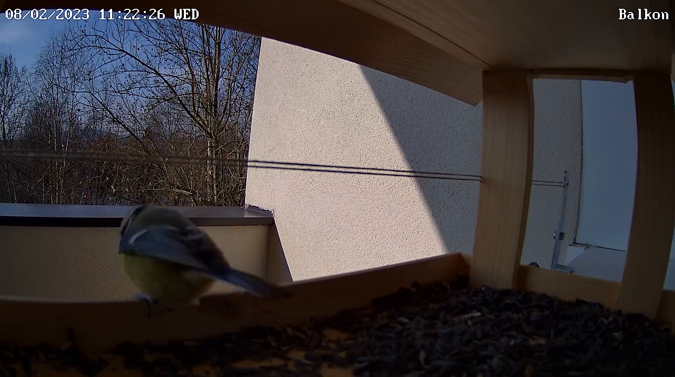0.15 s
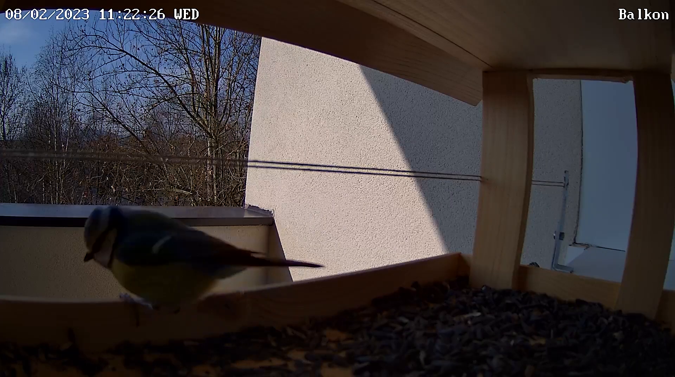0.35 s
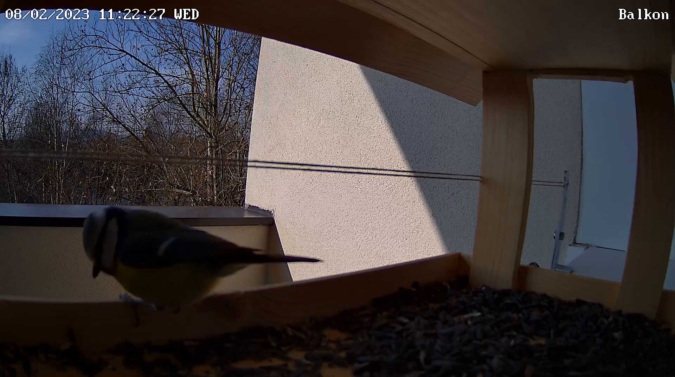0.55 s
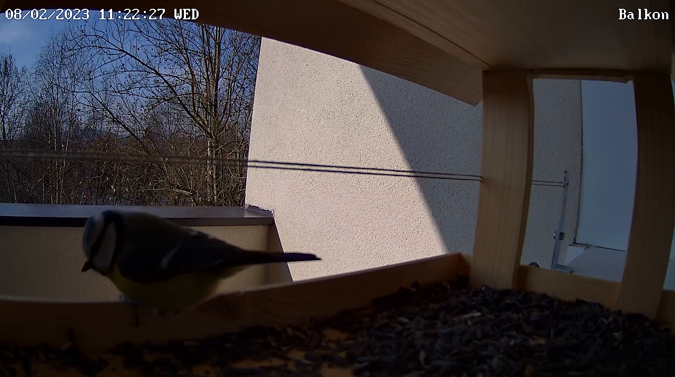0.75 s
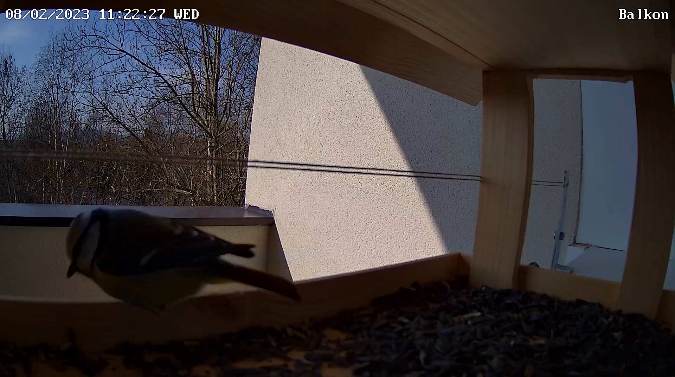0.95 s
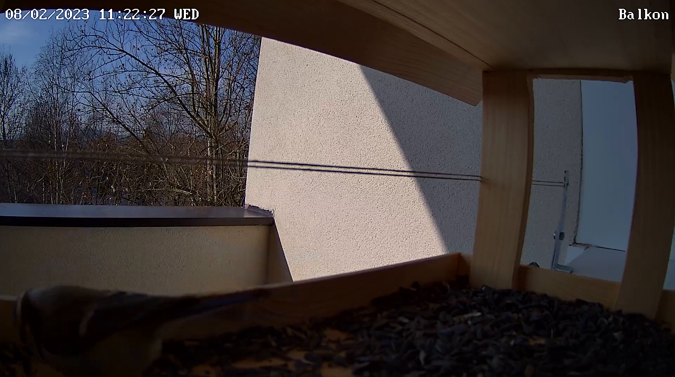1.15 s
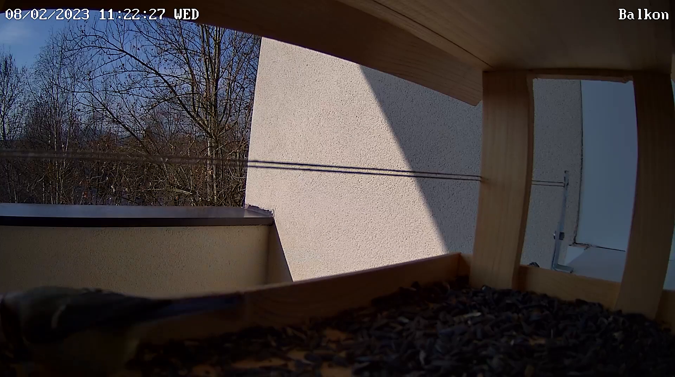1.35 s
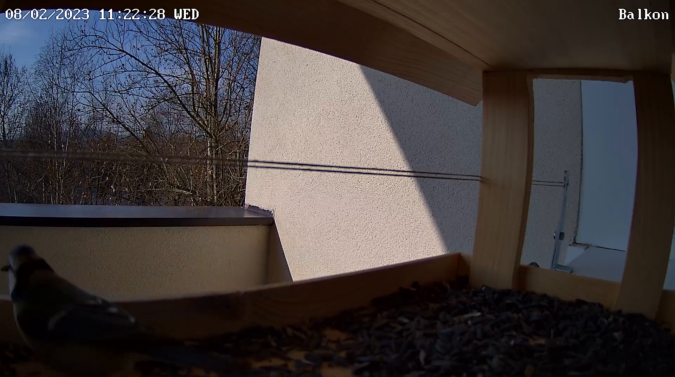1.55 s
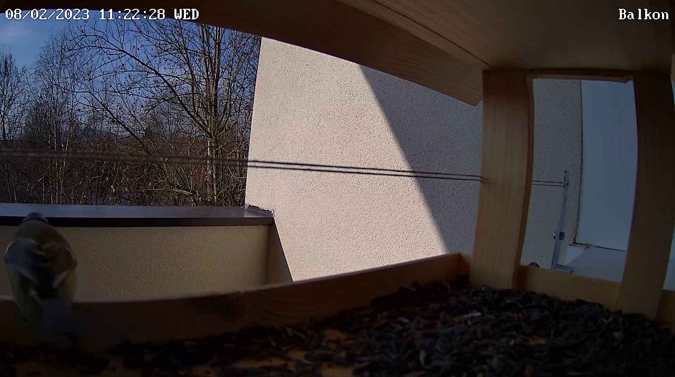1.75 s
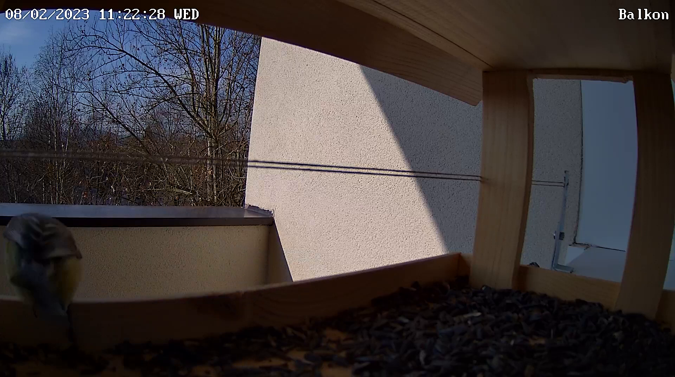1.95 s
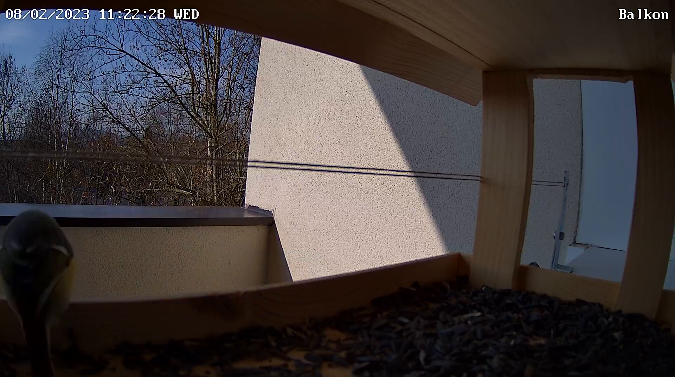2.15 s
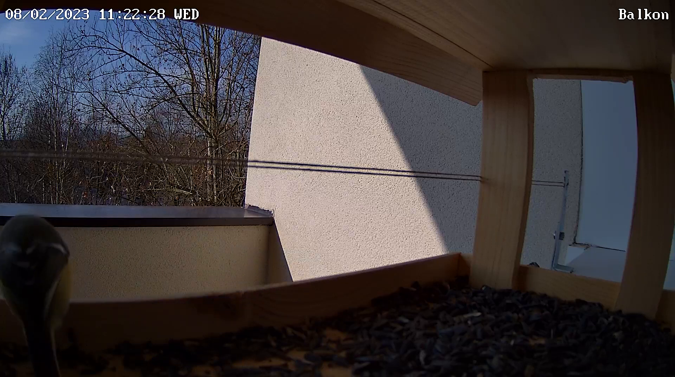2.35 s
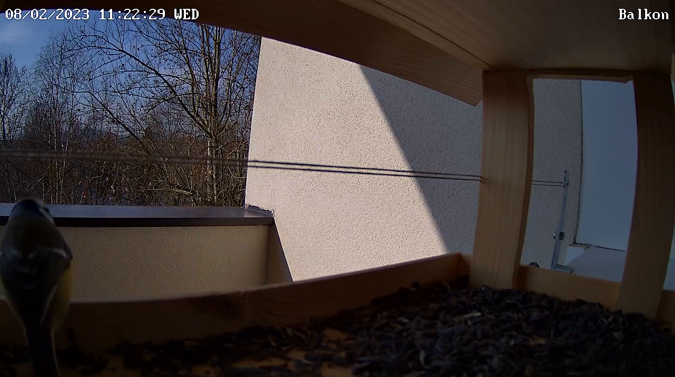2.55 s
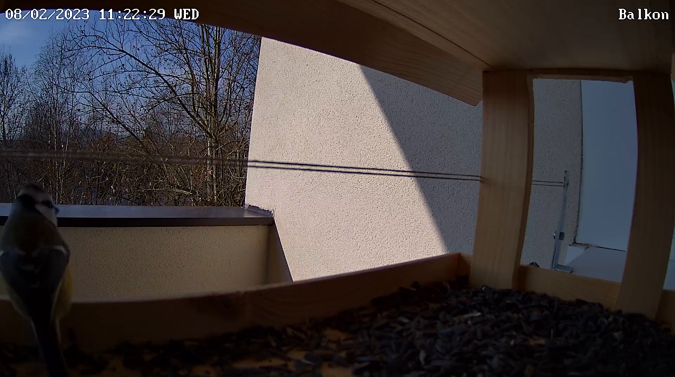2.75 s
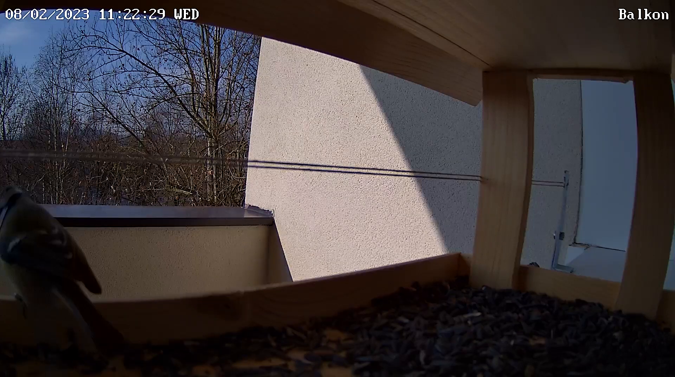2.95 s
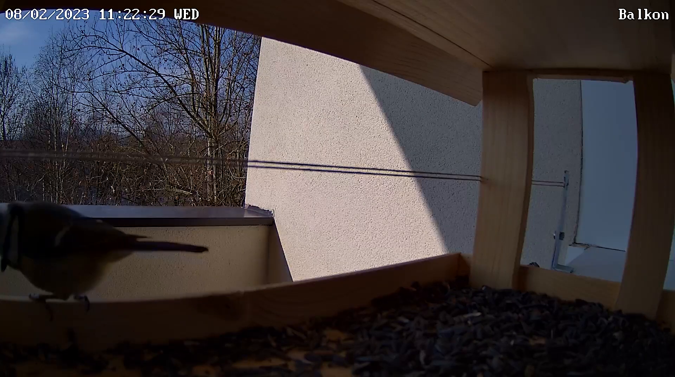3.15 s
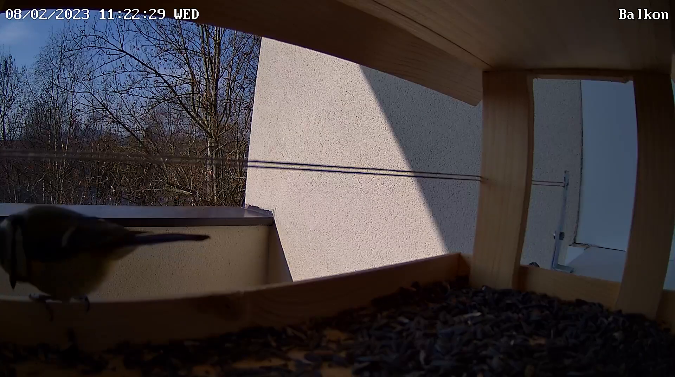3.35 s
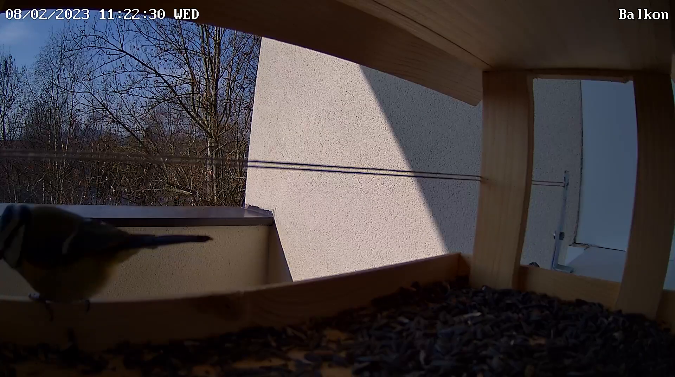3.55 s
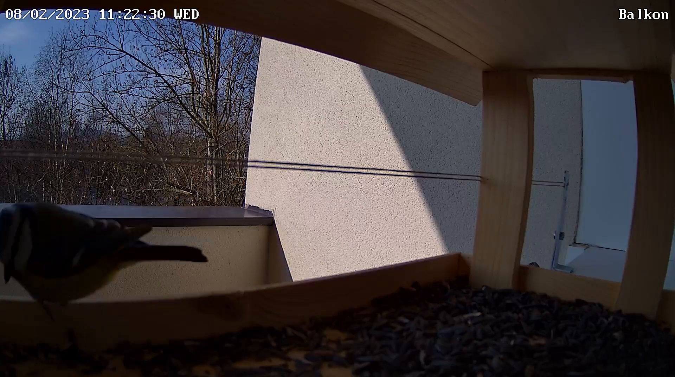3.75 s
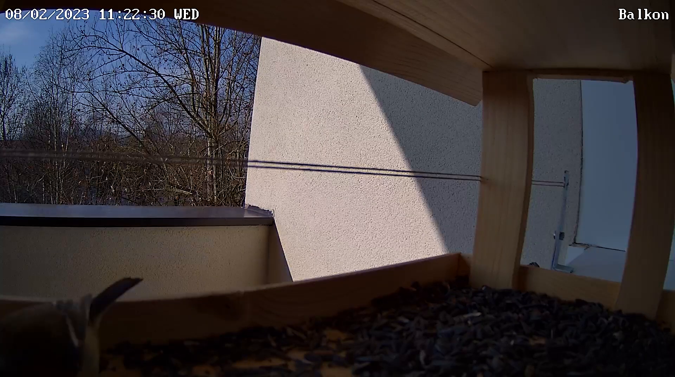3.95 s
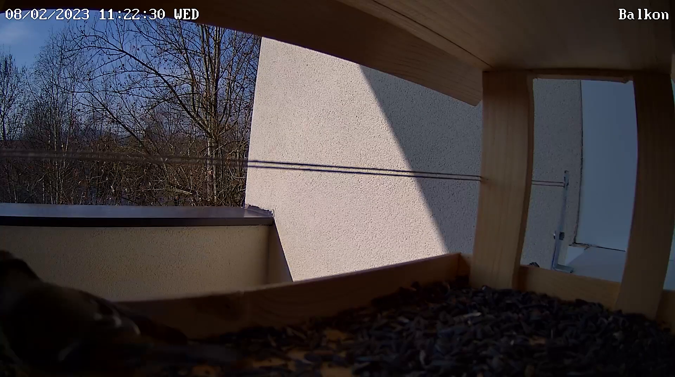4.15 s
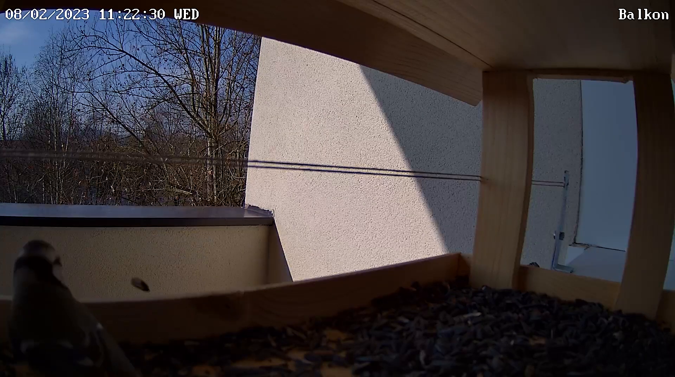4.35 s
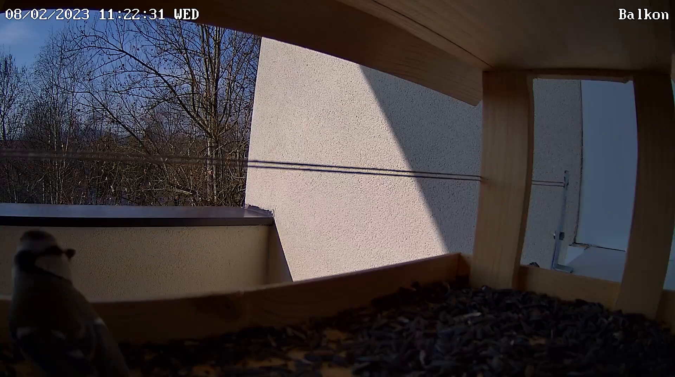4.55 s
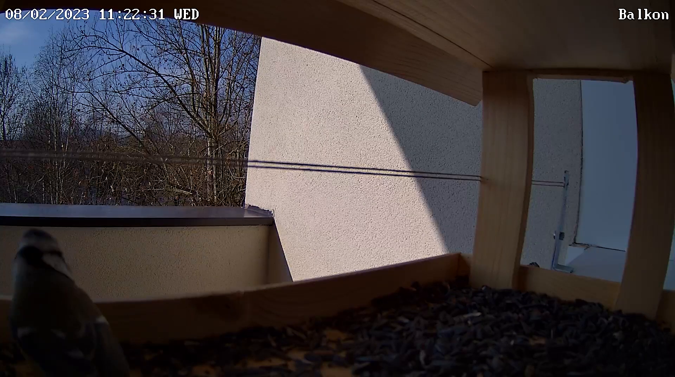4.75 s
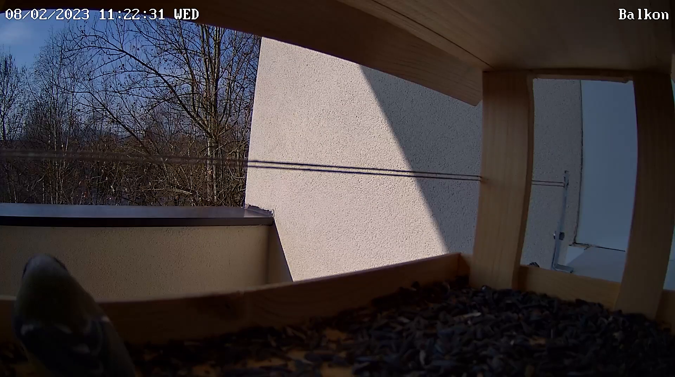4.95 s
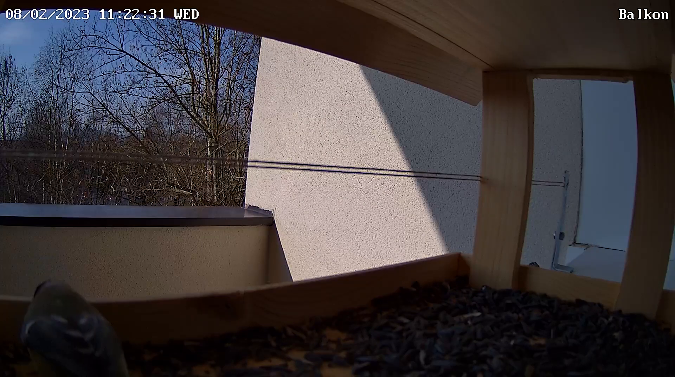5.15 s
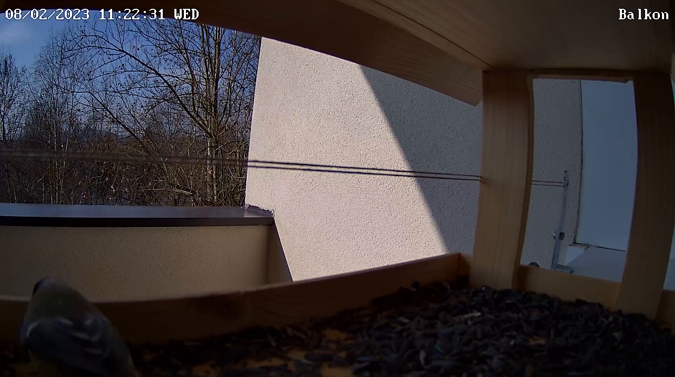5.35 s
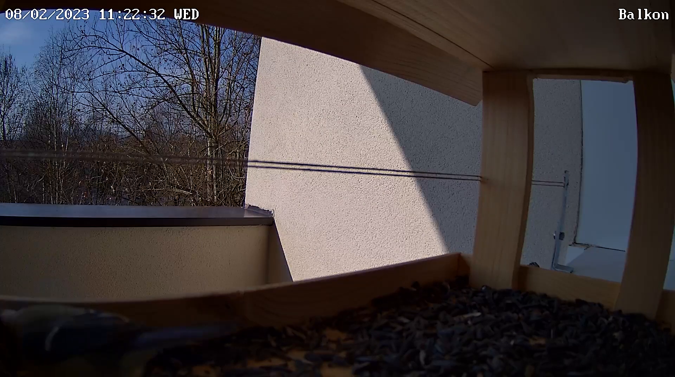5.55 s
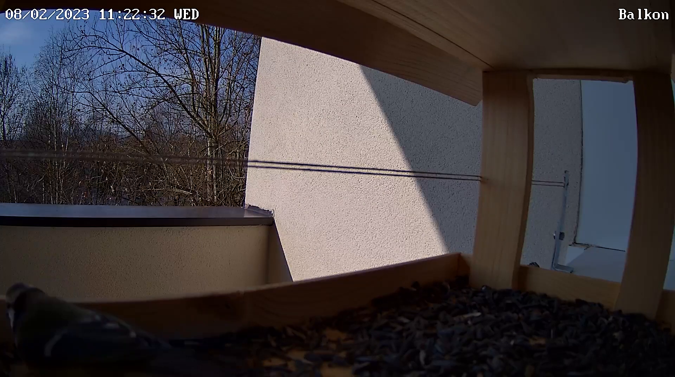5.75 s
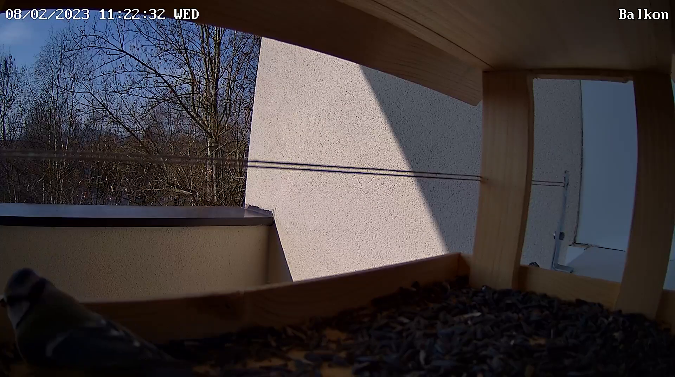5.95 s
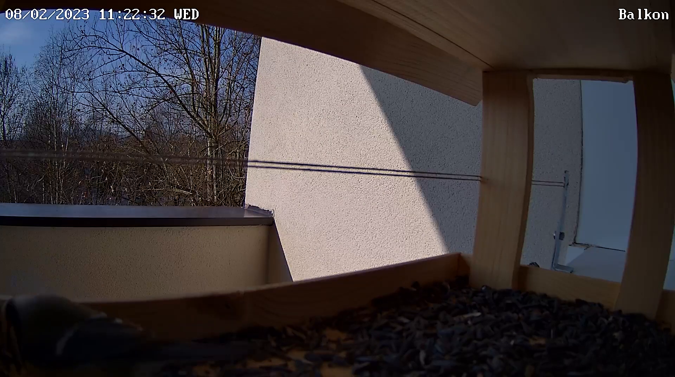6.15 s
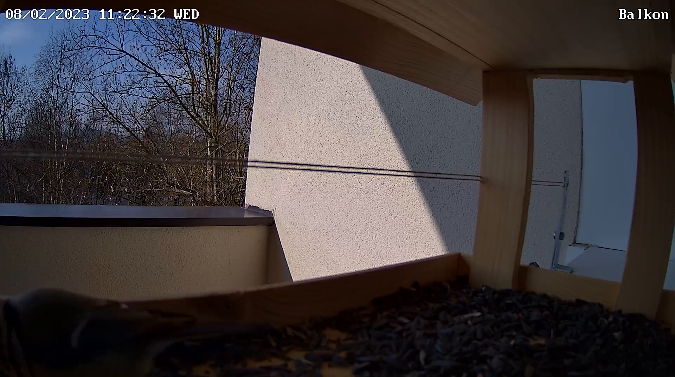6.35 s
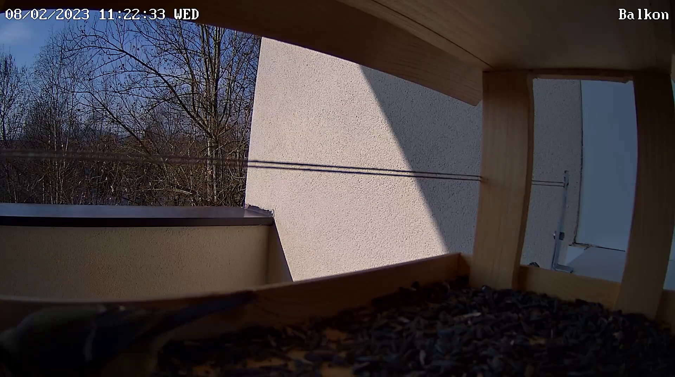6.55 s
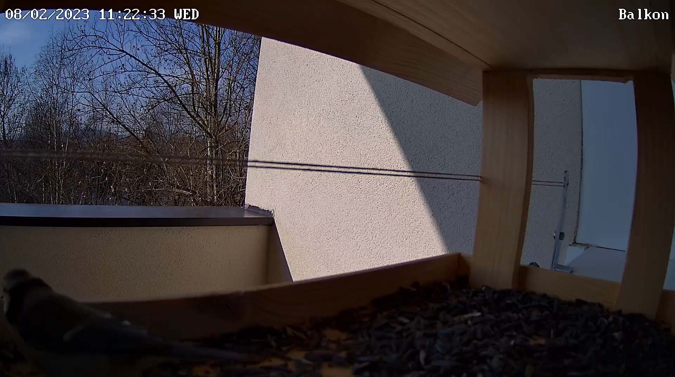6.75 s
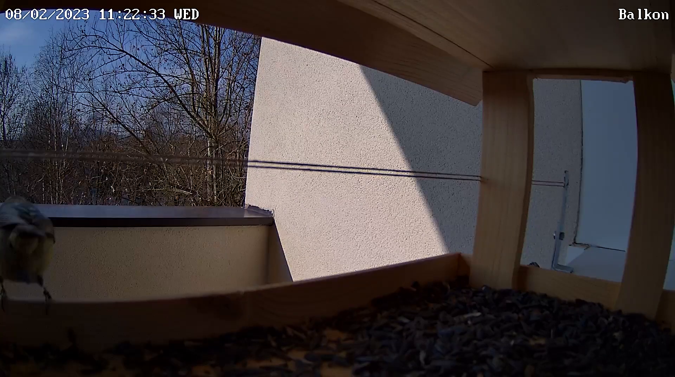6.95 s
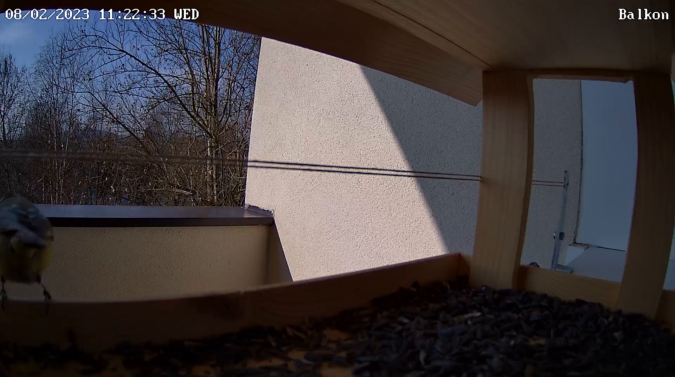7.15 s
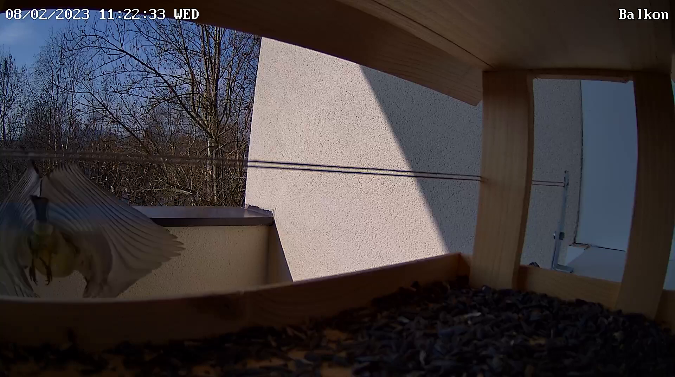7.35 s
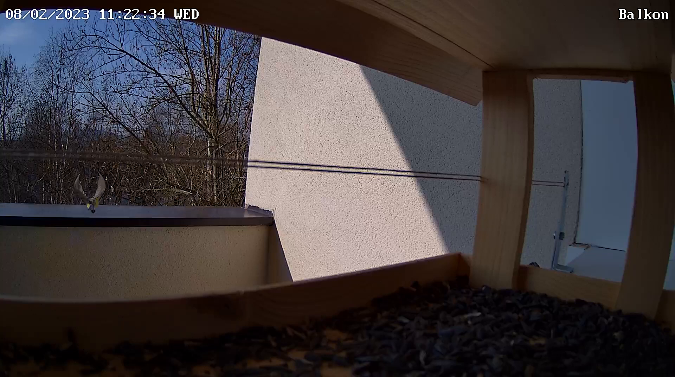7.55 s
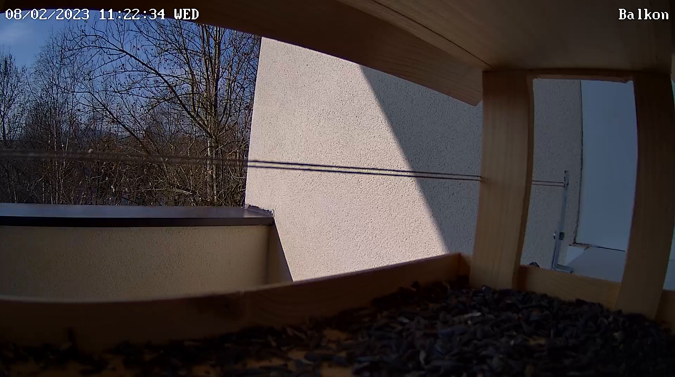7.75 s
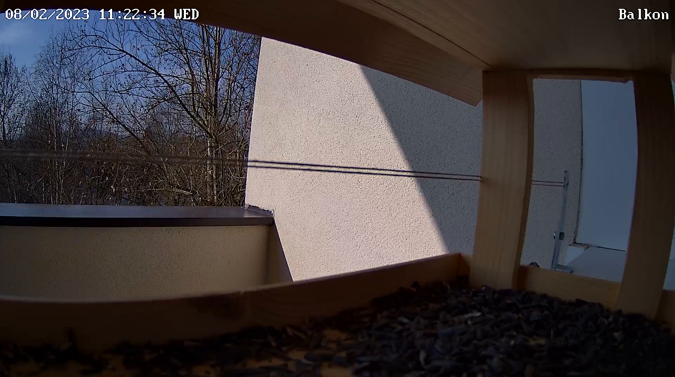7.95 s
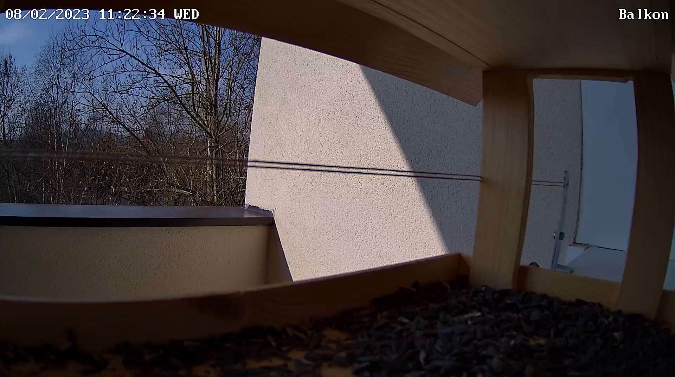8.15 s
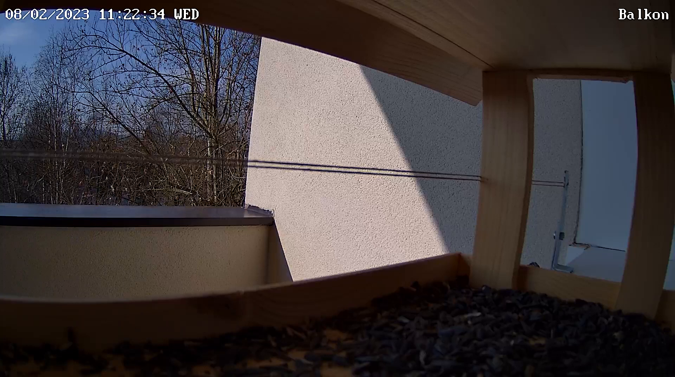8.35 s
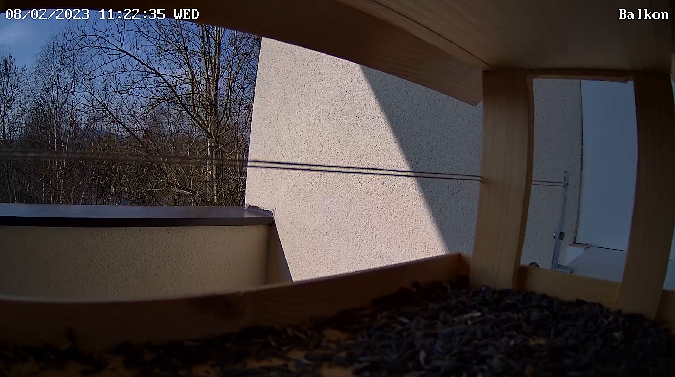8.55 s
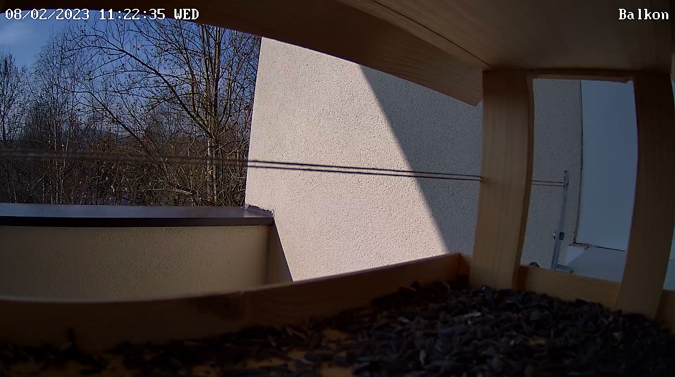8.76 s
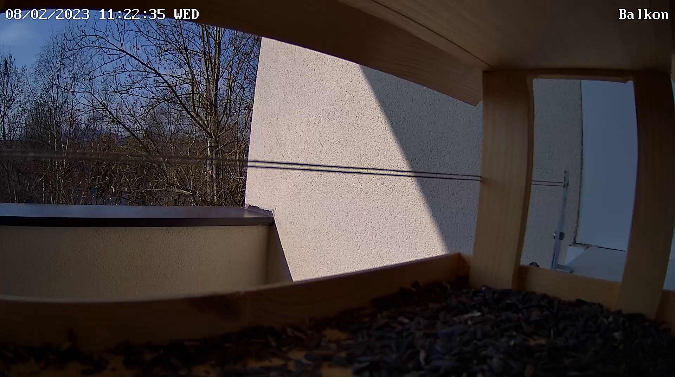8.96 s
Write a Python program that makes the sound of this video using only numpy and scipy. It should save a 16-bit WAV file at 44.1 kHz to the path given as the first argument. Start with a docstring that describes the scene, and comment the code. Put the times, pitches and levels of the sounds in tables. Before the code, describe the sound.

Outdoors on a balcony, the microphone sits very close to a wooden feeder tray, over a quiet low rumble, soft air hush and faint wavering deep hum. From 0 to 1.4 seconds a distant crow gives three hoarse, rasping caws with a slight echo, while seeds rustle lightly; a crisp husk rustle comes near 1.15. At 1.85 and 2.1 hard hollow knocks strike the wood, followed by scratchy claw taps until 2.8 and another knock at 3.2. Around 3.9 to 4.6 dry seeds crackle with sharp ticks and a tap. Sparse rustles and snaps follow at 5.2-5.9 and 6.5-6.9. A claw tap at 7.0 and light scrapes at 7.4 precede takeoff at 7.5: a low air thump and rapid, fading wing flutter. A tiny very high chirp sounds at 7.75. Three more distant caws come at 7.7, 8.3 and 8.8, the hum fading.

```python
"""Blue tit at a balcony feeder

Beak and claws tap and scratch a wooden tray: impacts and friction drive its damped modes.
Dry seeds stir (filtered random clicks); beak, claws and husks tick and snap (short resonant noise bursts).
A distant crow caws two series of three, a rasping pulse train shaped by throat resonances.
The bird flies off close past the microphone with pulsing air, and chirps once, a gliding sine.
Filtered noise makes a low outdoor rumble and a soft hush; a wavering hum lies over a faint mains tone.
"""
import sys
import numpy as np
from scipy import signal
from scipy.fft import rfft, irfft
from scipy.io import wavfile

SR = 44100
rng = np.random.default_rng(int(sys.argv[2]) if len(sys.argv) > 2 else 0)


def dump_mix(stems):
    """Bounce the given channels to the path in sys.argv[1] as a 16-bit WAV at rate SR."""
    frames = np.atleast_2d(stems).T  # one column per channel
    limited = np.clip(frames, -1, 1)  # hard clip at full scale
    pcm = np.round(limited * 32767).astype(np.int16)
    wavfile.write(sys.argv[1], SR, pcm)


N = 396018
TIME = np.arange(N) / SR


def from_db(db):
    """Decibel law: amplitude ratio of a level."""
    return 10 ** (np.asarray(db) / 20)


def rms_one(x):
    """Normalisation to unit root-mean-square."""
    return x / np.sqrt(np.mean(x ** 2) + 1e-20)


def response(spectrum, size=16384):
    """Minimum phase: causal impulse response of unit energy, found by folding the cepstrum."""
    hz, db = np.transpose(spectrum)
    octave = np.log2(np.maximum(np.arange(size // 2 + 1) * SR / size, 1))
    knots = np.log2(hz)
    # 48 dB per octave past either end of the spectrum
    outside = np.abs(octave - np.clip(octave, knots[0], knots[-1]))
    gain = from_db(np.maximum(np.interp(octave, knots, db) - 48 * outside, -100))
    cepstrum = irfft(np.log(gain))
    cepstrum[1:size // 2] *= 2
    cepstrum[size // 2 + 1:] = 0
    pulse = irfft(np.exp(rfft(cepstrum)))
    return pulse / np.linalg.norm(pulse)


def colour(x, spectrum):
    """Linear filtering: convolution with the impulse response of a spectrum."""
    return signal.fftconvolve(x, response(spectrum))[:N]


def drift(rate_hz):
    """Low-passed noise: a slow random course of rms 1."""
    r = np.exp(-2 * np.pi * rate_hz / SR)
    noise = rng.standard_normal(N + SR)
    return rms_one(signal.lfilter([1], [1, -2 * r, r * r], noise)[SR:])


def ring(clicks, hz, t60):
    """Damped oscillator: a unit click starts a sine of height 1 that decays by 60 dB in t60."""
    r, w = np.exp(-np.log(1000) / (t60 * SR)), 2 * np.pi * hz / SR
    return signal.lfilter([0, np.sin(w)], [1, -2 * r * np.cos(w), r * r], clicks + 1e-18)


def resonance(x, hz, width_hz):
    """Band-pass resonance: gain 1 at its pitch, falling away on both sides."""
    r = np.exp(-np.pi * width_hz / SR)
    poles = [1, -2 * r * np.cos(2 * np.pi * hz / SR), r * r]
    return signal.lfilter(np.array([1, 0, -1]) * (1 - r * r) / 2, poles, x + 1e-18)


def clicks_at(times, sizes):
    """Impulse train: single clicks at given times."""
    out = np.zeros(N)
    out[np.round(times * SR).astype(int)] = sizes
    return out


def grains(per_s, spread_db):
    """Shot noise: random tiny contacts of uneven size and either sign; rms 1."""
    sizes = from_db(spread_db * np.minimum(rng.exponential(1, N), 3)) * rng.choice([-1, 1], N)
    return rms_one(sizes * (rng.random(N) < per_s / SR))


def swell(t, rise_s, fade_s, bend=1):
    """Exponential envelope: 20 dB down one rise before t = 0 and one fade after; bend rounds the top."""
    away = np.maximum(-t / rise_s, t / fade_s)
    return from_db(-20 * np.minimum(away, 5) ** bend)


def strokes(rows, rise_share, bend, loose_db, loose_ratio):
    """Power addition: short movements, each amid weaker, longer fidgeting, joined in one envelope."""
    t = TIME[::16]
    power = 0
    for s, length, db in rows:
        rise_s = rise_share * length
        movement = swell(t - s, rise_s, length, bend)
        fidgeting = from_db(loose_db) * swell((t - s) / loose_ratio, rise_s, length, bend)
        power = power + from_db(db) ** 2 * (movement ** 2 + fidgeting ** 2)
    return np.interp(TIME, t, np.sqrt(power))


def echoes(x, t60, per_s):
    """Diffuse reverberation: scattered decaying reflections of unit energy, the first after 3 ms."""
    t = TIME[:SR]
    arrivals = rng.standard_normal(SR) * (rng.random(SR) < per_s / SR) * (t > .003)
    walls = arrivals * np.exp(-np.log(1000) * t / t60)
    return signal.fftconvolve(x, walls / np.linalg.norm(walls))[:N]


# Outdoor rumble spectrum. Each row: frequency in Hz, relative density in dB per Hz.
RUMBLE = [(12, -3.5), (25, 3), (34, -0.5), (43, -6.5), (51, -4), (61, -8), (72, -12.5), (87, -18),
          (99, -20.5), (140, -20.5), (200, -27), (255, -20.5), (300, -28)]
# Course of the rumble. Each row: time in seconds, rms level in dB.
RUMBLE_LEVEL = [(0, -39), (1.3, -40.5), (1.9, -40.5), (8.2, -41), (8.9, -45.5)]
# Hush of the far surroundings. Each row: frequency in Hz, relative density in dB per Hz.
AIR = [(110, -37.5), (190, -8.5), (335, -3), (408, -13.5), (433, -7), (541, -16.5), (792, -14),
       (989, -18.5), (1360, -21), (1990, -33.5), (3600, -59.5), (4680, -93.5)]
AIR_DB = -57


def outdoors():
    """Filtered noise: a low rumble of changing level and the soft hush of far surroundings."""
    rumble_gain = from_db(np.interp(TIME, *np.transpose(RUMBLE_LEVEL)))
    rumble = rumble_gain * colour(rng.standard_normal(N), RUMBLE)
    return rumble + from_db(AIR_DB) * colour(rng.standard_normal(N), AIR)


# Low hum before its wavering. Each row: time in seconds, pitch in Hz, level in dB before the trim.
HUM = [(0.0, 57.5, -43.5), (0.71, 57, -48.5), (0.831, 53.23, -40.5), (1.81, 49.5, -44.5),
       (3.392, 49, -49.5), (3.98, 52.02, -38.5), (4.74, 46.5, -46), (6.95, 45.6, -49), (7.3, 51.34, -40)]
MAINS_HZ, MAINS_DB = 100.5, -63  # faint and steady


def hum(hum_db=-1.0, waver_db=2, waver_hz=2, fade_db_per_s=6):
    """Frequency and amplitude modulation: a deep hum surges, wavers and at last fades, over a mains tone."""
    s, hz, db = np.transpose(HUM)
    pitch = np.interp(TIME, s, hz) + waver_hz * drift(4)
    phase = 2 * np.pi * np.cumsum(pitch) / SR
    fade_db = fade_db_per_s * np.maximum(TIME - s[-1], 0)
    level_db = np.interp(TIME, s, db) - fade_db + hum_db + waver_db * drift(9.8)
    deep = from_db(level_db) * np.sin(phase)
    mains = from_db(MAINS_DB) * np.sin(2 * np.pi * MAINS_HZ * TIME)
    return np.sqrt(2) * (deep + mains)  # levels are rms


# Caws. Each row: start in seconds, length in seconds, top pitch in Hz before jitter,
# relative level in dB, fading after the top in dB per caw length.
CAWS = [(.025, .345, 335, -43, 9), (.6, 0.3, 336, -45, 13), (1.14, .28, 328, -46.5, 11),
        (7.665, .33, 337, -43.5, 9), (8.262, .345, 340, -43, 11), (8.805, 0.34, 334, -45.5, 12)]
# place of the top, rise and fall of pitch, and time of beak closing, all relative to the caw's length
ARCH_TOP, ARCH_RISE, ARCH_FALL, ARCH_BEND, BEAK_SHUT = .16, .2, .18, 1.5, 0.55
CAW_ATTACK_S, CAW_RELEASE_S, CAW_SWELL_DB = .04, .05, 5


def caw_gestures():
    """Articulation: pitch, loudness and beak opening; each caw is loudest at the top of its pitch arch."""
    pitch, level, opening = np.full(N, CAWS[0][2], float), np.zeros(N), np.zeros(N)
    for s, length, hz, db, fading_db in CAWS:
        on = (TIME > s - 2 * CAW_ATTACK_S) & (TIME < s + length + 2 * CAW_RELEASE_S)
        t = TIME[on] - s
        along = t / length
        before, after = np.maximum(ARCH_TOP - along, 0), np.maximum(along - ARCH_TOP, 0)
        pitch[on] = hz * (1 - ARCH_RISE * before - ARCH_FALL * after ** ARCH_BEND)
        attack = np.minimum(t / CAW_ATTACK_S, 0)
        release = np.minimum((length - t) / CAW_RELEASE_S, 0)
        arch_db = db - CAW_SWELL_DB * before / ARCH_TOP - fading_db * after
        level[on] = from_db(arch_db + 20 * (attack + release))
        opening[on] = np.clip(1 - along / BEAK_SHUT, 0, 1)
    return pitch, level, opening


# Throat with the beak wide. Each row: frequency in Hz, relative density in dB per Hz.
THROAT_WIDE = [(350, -60), (600, -22.5), (669, -13.5), (824, -6.5), (1020, -9.5), (1100, -18), (1350, -10),
               (1650, -4.5), (2000, -1), (2400, -4), (2620, -11), (2790, -4.5), (2970, -18), (3040, -15.5),
               (3800, -35), (4940, -68)]
# Throat with the beak half closed. Each row: frequency in Hz, relative density in dB per Hz.
THROAT_NARROW = [(350, -45.5), (600, -15.5), (756, -10), (969, -11.5), (1100, -16), (1290, -8.5),
                 (1620, -1.5), (1810, -6.5), (1960, -8), (2280, -2), (2640, -12.5), (2900, -13.5),
                 (3160, -20.5), (3800, -34), (4940, -69)]
# Thin top of the caw. Each row: frequency in Hz, relative density in dB per Hz.
CAW_TOP = [(5600, -38.5), (6400, -15.5), (6950, -8), (7200, -15), (7800, -37.5)]
# Harmonics clear of the rasp. Each row: multiple of the pitch, mean relative level in dB.
CLEAR = [(3, -21), (5, -9.5), (6, -14), (7, -9.5)]
# Hollow of the feeder, ringing along. Each row: frequency in Hz, relative gain in dB.
HOLLOW = [(735, -4), (1002, -6), (1273, -1), (1471, -6), (1690, -8), (1954, -7), (2160, -8), (2360, -7),
          (2870, -3)]
# pitch jitter as a share, depth of the rasp, breath noise, reflections on the balcony
JITTER, RASP, HOARSE_DB, BALCONY_DB = .015, 1.3, -13, -4


def crow(rasp_ratio=0.3, top_db=-22, wet_db=-16, distance_hz=4000, direct_db=-4, hollow_hz=40):
    """Source and filter: pulses in bursts of about three excite the throat; clear harmonics glide above."""
    pitch, level, opening = caw_gestures()
    cycles = np.cumsum(pitch * (1 + JITTER * drift(150))) / SR
    burst = np.cos(2 * np.pi * rasp_ratio * cycles + 1.2 * drift(18))
    # each burst swells the pulses and shifts their timing
    pulses = rms_one(np.diff(np.floor(cycles + .035 * burst), prepend=0))
    breath = from_db(HOARSE_DB) * rng.standard_normal(N)
    source = np.exp(RASP * burst / 2) * (pulses + breath)
    wide = rms_one(colour(source, THROAT_WIDE))
    narrow = rms_one(colour(source, THROAT_NARROW))
    top = from_db(top_db) * rms_one(colour(source, CAW_TOP))
    rasp = level * (opening * wide + (1 - opening) * narrow + (1 + opening) / 2 * top)
    clear = 0
    for k, db in CLEAR:
        harmonic = np.sin(2 * np.pi * (k * cycles + rng.random()))
        clear = clear + np.sqrt(2) * from_db(db + 2 * drift(20)) * harmonic
    balcony = echoes(rasp, t60=.08, per_s=1500)
    voice = rasp + level * clear
    far = echoes(voice, t60=3, per_s=900)
    houses = signal.sosfilt(signal.butter(2, distance_hz, fs=SR, output="sos"), far)
    arriving = voice + from_db(BALCONY_DB) * balcony + from_db(wet_db) * houses
    hollow = sum(from_db(db) * resonance(arriving, hz, hollow_hz) for hz, db in HOLLOW)
    return from_db(direct_db) * arriving + hollow


# Seeds stirred. Each row: time of the peak in seconds, fade by 20 dB in seconds, relative level in dB.
STIRS = [(.145, 0.072, -54), (.405, 0.054, -53), (1.09, 0.032, -49.5), (1.157, 0.03, -40.5),
         (1.31, 0.22, -55), (1.8, 0.058, -58.5), (2.18, 0.052, -53), (2.412, 0.024, -48.5),
         (3.18, 0.04, -56.5), (3.61, 0.063, -66.5), (3.87, 0.027, -46.5), (3.968, 0.017, -39.5),
         (4.0, 0.053, -50.5), (4.07, 0.11, -54), (4.29, 0.05, -51.5), (4.34, 0.086, -49.5),
         (4.56, 0.057, -52.5), (5.22, 0.03, -65.5), (5.51, 0.049, -51.5), (5.543, 0.013, -46.5),
         (5.59, 0.13, -60), (5.711, 0.01, -42.5), (6.12, 0.036, -57), (6.24, 0.034, -65.5),
         (6.52, 0.03, -44.5), (6.68, 0.015, -53), (6.755, 0.032, -56.5), (6.895, 0.096, -53.5)]
# Sound of dry husks. Each row: frequency in Hz, relative density in dB per Hz.
HUSKS = [(470, -45.5), (800, -2), (1020, -1), (1300, -8), (2500, 3.5), (2710, -2.5), (3350, 1.5),
         (3890, -6), (4220, -6.5), (4620, -10.5), (5260, -4), (7340, -8), (8890, -23.5), (11600, -65.5)]


def seeds(slide_db=-11, clump_db=3, width_share=0.13):
    """Granular contact: dry husks click in clumps, each click ringing at its own pitch, and slide as noise."""
    husks = 0
    for hz in np.geomspace(900, 8000, num=22):
        husks = husks + resonance(grains(per_s=130, spread_db=3), hz, width_share * hz)
    clicking = rms_one(colour(husks * from_db(clump_db * drift(52)), HUSKS))
    sliding = from_db(slide_db) * colour(rng.standard_normal(N), HUSKS)
    stirring = strokes(STIRS, rise_share=0.74, bend=1.02, loose_db=-11.0, loose_ratio=1.7)
    return (clicking + sliding) * stirring


SKIRT_SHARE = 0.44  # width of a mode's skirts as a share of its pitch


def tray_mode(drive, hz, t60):
    """Modal vibration: one mode swells for an instant and rings, with little sound beside its pitch."""
    return resonance(ring(drive, hz, t60), hz, SKIRT_SHARE * hz)


# Beak and claws on the tray. Each row: time in seconds, then relative levels in dB of the knock,
# the dull thud and the sharp tick, and the tilt of the knock at that spot in dB per octave.
TAPS = [(0.1456, -35, -39, -42, -4), (0.3903, -45, -37, -45, 15), (0.422, -32, -33, -39, -21),
        (1.1527, -47, -39, -42, -2), (1.365, -40, -43, -43, -3), (1.845, -16.5, -33, -36, 0.5),
        (1.855, -31, -29, -52, -17.5), (2.0888, -16, -42, -27.5, -1), (2.1015, -39.5, -60.5, -26, 1),
        (2.19, -27, -57.5, -45, -3.5), (2.2138, -26, -43, -39.5, 0), (2.303, -37.5, -56.5, -50.5, 3),
        (2.334, -24, -61.5, -42, 3.5), (2.341, -35, -55.5, -39.5, 2.5), (2.349, -30.5, -37.5, -37, 1),
        (2.368, -49.5, -58, -39, 2.5), (2.4091, -21, -27, -25, 0.5), (2.4326, -30, -63, -37, -1.5),
        (2.46, -45, -56, -48.5, -1.5), (2.5519, -33, -47, -35.5, 0.5), (2.7405, -26, -73.5, -46, 11),
        (2.7541, -25, -56.5, -43.5, 4), (2.788, -34.5, -69, -57, 7), (3.004, -36, -70, -53, 1.5),
        (3.041, -33.5, -67, -51, 6), (3.2009, -20.5, -28.5, -32, 4.5), (3.8289, -40.5, -57, -49.5, -2),
        (3.902, -40, -53, -42, -2), (4.3251, -51, -39, -35, 2), (4.5295, -25, -37.5, -44, 3),
        (5.2126, -50, -30.5, -64, -2), (5.686, -48, -38, -48, 0), (5.845, -41, -27, -44, -7),
        (6.5025, -38, -38, -40, -1), (6.9972, -23, -38, -39.5, 0.5), (7.032, -32, -50, -55.5, -8.5),
        (7.3914, -29, -59, -43, -3)]
# Modes of the tray. Each row: frequency in Hz, relative level in dB, 60 dB decay time in seconds.
TRAY = [(320, -9, 0.032), (414, -13.5, 0.089), (538, -11, 0.056), (988, -12.5, 0.06), (1153, -2.5, 0.039),
        (1590, -0.5, 0.051), (1713, -7, 0.026), (2131, 1, 0.071), (2220, -4, 0.05), (2287, -7, 0.04),
        (2637, -1, 0.032), (2770, -3.5, 0.026), (2980, -1.5, 0.016), (3310, -2.5, 0.014),
        (3490, 0.5, 0.021), (3720, -11.5, .02), (4230, -16.5, 0.025)]
# Tick of horn on wood. Each row: frequency in Hz, relative density in dB per Hz.
TICK = [(2000, 3), (3500, -0.5), (4600, -4), (5500, -6.5), (6300, -2.5), (7000, -2.5), (7700, -16.5),
        (8800, -28)]
REBOUND_S, REBOUND_DB = 0.011, -17.5  # mean delay and size of the light second touch


def taps(knock_db=-12, tick_db=12, skid_s=0.0032, skid_db=-13, spot_db=2):
    """Impact excitation: each touch skids, rings the modes of the spot struck, ticks and rebounds."""
    s, knock, thud, tick, tilt = np.transpose(TAPS)
    press = signal.lfilter([1], [1, -np.exp(-1 / (skid_s * SR))], clicks_at(s, 0.81))
    skid = from_db(skid_db) * press * grains(per_s=8000, spread_db=0.5)
    again = s + REBOUND_S * (1 + 0.3 * rng.uniform(-0.92, 1, len(s)))
    strike = clicks_at(s + .0005, 0.82) + clicks_at(again, from_db(REBOUND_DB))
    nearest = np.searchsorted((s[1:] + s[:-1]) / 2, TIME)  # index of the nearest tap
    out = colour((0.11 * strike + skid) * from_db(tick + tick_db)[nearest], TICK)
    for k, (hz, db, t60) in enumerate(TRAY):
        # the bird's weight drives the low modes, the hardness of the contact the high ones
        low, high = np.clip((1500 - hz) / 900, 0, 1), np.clip((hz - 2200) / 3600, 0, 1)
        middle_db = knock + knock_db + tilt * np.log2(hz / 1800)
        hard_db = np.maximum(tick, knock - 20)
        force_db = low * thud + (1 - low - high) * middle_db + high * hard_db
        force = from_db(force_db + db + spot_db * rng.standard_normal(len(s)))
        out += (-1) ** k * tray_mode((strike + 0.37 * skid) * force[nearest], hz, t60)
    return out


# Claws on the wood. Each row: time of the peak in seconds, fade by 20 dB in seconds,
# relative level in dB, sharpness (level of the ticking beside the wood) in dB.
SCRATCHES = [(0.422, 0.099, -43.5, -26), (1.069, 0.15, -48.5, -17), (2.115, 0.12, -43.5, -18.5),
             (2.209, 0.066, -34.5, -15.5), (2.351, 0.048, -37.5, -11), (2.464, 0.045, -49.5, -10),
             (2.76, 0.1, -46.5, -15), (3.052, 0.033, -51.5, -4.5), (3.12, 0.063, -58, -14),
             (3.198, 0.027, -51.5, -11.5), (3.457, 0.048, -57.5, -33), (3.861, 0.039, -44, -9),
             (7.012, .04, -41, -8.5), (7.074, 0.03, -53, -31), (7.399, 0.027, -41, -6),
             (7.446, 0.02, -43.5, -33.5), (7.477, 0.024, -41.5, -39)]


def scratches(catch_db=3):
    """Stick-slip friction: claws catch and slip in uneven runs, driving the tray modes and a sharp tick."""
    slips = rms_one(grains(per_s=2600, spread_db=-1.0) * from_db(catch_db * drift(90)))
    motion = dict(rise_share=.46, bend=1.1, loose_db=-20, loose_ratio=2)
    drive = slips * strokes([(s, length, db) for s, length, db, sharp in SCRATCHES], **motion)
    edge = slips * strokes([(s, length, db + sharp) for s, length, db, sharp in SCRATCHES], **motion)
    wood, energy = 0, 0
    for k, (hz, db, t60) in enumerate(TRAY):
        wood = wood + (-1) ** k * from_db(db) * tray_mode(drive, hz, t60)
        energy = energy + from_db(db) ** 2 * t60 * SR / (4 * np.log(1000))
    return wood / np.sqrt(energy) + colour(edge, TICK)


# Sharp ticks and snaps of beak, claws and husks.
# Each row: start in seconds, peak in dB before the trim, pitch in Hz.
SHARP_TICKS = [(.915, -58.5, 3330), (1.1557, -41, 3880), (1.2945, -44, 5930), (1.300, -36, 6600),
               (1.4516, -50.5, 6600), (2.0909, -41, 6840), (2.4098, -25.5, 5930), (3.5858, -52, 7530),
               (3.8876, -36, 5260), (3.9621, -37, 5350), (3.9671, -42, 5110), (3.9852, -40.5, 4204),
               (4.254, -44.5, 3330), (4.325, -41, 5000), (4.335, -34, 5300), (5.5338, -39, 4180),
               (5.5438, -41, 6900), (5.5829, -46, 5100), (5.7101, -38.5, 5090), (5.8823, -51.5, 3300),
               (6.113, -47, 5940), (6.4667, -51.5, 5160), (6.5165, -38.5, 6060), (6.5274, -46, 5000),
               (6.5666, -51, 6170), (6.68, -49.5, 5200)]


def sharp_ticks(trim_db=2, decay_s=0.007, width_hz=1300, crack_db=-16):
    """Transient excitation: a noise burst of milliseconds gives a broad crack and a short pitched ring."""
    out, t = np.zeros(N), TIME[:2048]
    crack_response = response(HUSKS)[:len(t)]
    for s, db, hz in SHARP_TICKS:
        burst = rng.standard_normal(len(t)) * np.exp(-t / decay_s)
        ringing = resonance(resonance(burst, hz, width_hz), hz, width_hz)
        crack = from_db(crack_db) * signal.fftconvolve(burst, crack_response)[:len(t)]
        tick = ringing + crack
        start = int(s * SR)
        out[start:start + len(t)] += from_db(db + trim_db) * tick / np.abs(tick).max()
    return out


# Air brushed by the feathers. Each row: frequency in Hz, relative density in dB per Hz.
FEATHERS = [(60, 10), (130, -1), (260, -2), (390, -8), (650, -30.5)]
LEAP_S, STROKE_S, WINGBEAT_HZ = 7.491, 7.519, 25.38  # leap, first downstroke, wingbeat rate
WING_ATTACK_S = 0.035  # rise by 20 dB before the first downstroke
# air push and feather whoosh fade as the bird leaves
PUSH_DB, PUSH_FADE_DB_PER_S = -24.5, 139
WHOOSH_DB, WHOOSH_FADE_DB_PER_S = -27.5, 95
# the pulsing air swells once more behind the bird
WAKE_S, WAKE_WIDTH_S, WAKE_DB = 7.745, 0.11, -22


def wings(gust_db=-11, gust_s=0.0054, suction=0.54, suction_lag_s=0.023, upstroke_share=0.05,
          rush_db=-28, flap_db=19):
    """Unsteady airflow: the leap shoves air at the microphone; wingbeats then pump it, flap and whoosh."""
    flown = TIME - STROKE_S
    push = from_db(PUSH_DB) * swell(flown, WING_ATTACK_S, 20 / PUSH_FADE_DB_PER_S)
    push = push + from_db(WAKE_DB) * np.exp(-((TIME - WAKE_S) / WAKE_WIDTH_S) ** 2)
    whoosh = from_db(WHOOSH_DB) * swell(flown, WING_ATTACK_S, 20 / WHOOSH_FADE_DB_PER_S)
    beat = np.cos(2 * np.pi * WINGBEAT_HZ * flown)
    downstroke = ((1 + beat) / 2) ** 5
    eddies = colour(rng.standard_normal(N), FEATHERS)
    since = TIME - LEAP_S
    shove = np.exp(-(since / gust_s) ** 2)
    gust = shove - suction * np.exp(-((since - suction_lag_s) / gust_s) ** 2)
    leap = from_db(gust_db) * gust * (1 + from_db(rush_db) * eddies)
    stroke_times = np.arange(STROKE_S, TIME[-1] - 1 / 2, 1 / WINGBEAT_HZ)
    flaps = colour(whoosh * clicks_at(stroke_times, from_db(flap_db)), FEATHERS)
    return leap - push * beat - flaps + whoosh * (downstroke + upstroke_share) * eddies


# The two notes. Each row: time of the top in seconds, rise in seconds, fall in seconds, peak in dB.
CHIRP = [(7.727, 0.0072, 0.007, -56), (7.76, 0.0096, .019, -40)]
# pitch at the top, and the drop of pitch and level one rise before it or one fall after it
CHIRP_HZ, CHIRP_DROOP_HZ, CHIRP_DROOP_DB = 6970, 743, 26


def chirp(wet_db=-5):
    """Frequency modulation: a thin whistle in two arches, loudest where highest, echoed by the house wall."""
    tone = np.zeros(N)
    for s, rise, fall, db in CHIRP:
        droop = np.maximum((s - TIME) / rise, (TIME - s) / fall) ** 2
        on = droop < 1.5
        phase = 2 * np.pi * np.cumsum(CHIRP_HZ - CHIRP_DROOP_HZ * droop[on]) / SR
        tone[on] += from_db(db - CHIRP_DROOP_DB * droop[on]) * np.sin(phase)
    return tone + from_db(wet_db) * echoes(tone, t60=0.2, per_s=1100)


DEAD_HZ, DEAD_WIDTH_HZ = 2430, 130  # between two groups of modes the tray is dead


def scene():
    """Superposition: feeding sounds with short reflections under the roof, then all other sources."""
    notch = signal.iirnotch(DEAD_HZ, DEAD_HZ / DEAD_WIDTH_HZ, fs=SR)
    wood = signal.lfilter(*notch, taps() + scratches())
    feeding = wood + seeds() + sharp_ticks()
    under_roof = feeding + from_db(-16.5) * echoes(feeding, t60=0.19, per_s=1800)
    return (under_roof + crow() + chirp() + wings() + outdoors() + hum())[None, :]


CUTOFF_HZ = 9000


def record(dry):
    """Band limiting: a steep low-pass holds everything above the cut-off at least 60 dB down."""
    return signal.sosfilt(signal.cheby2(20, 60, CUTOFF_HZ, fs=SR, output="sos"), dry)


dry = scene()
out = record(dry)
dump_mix(out)
```